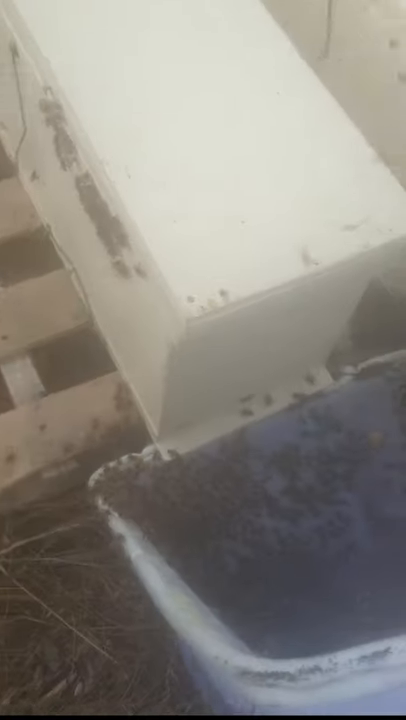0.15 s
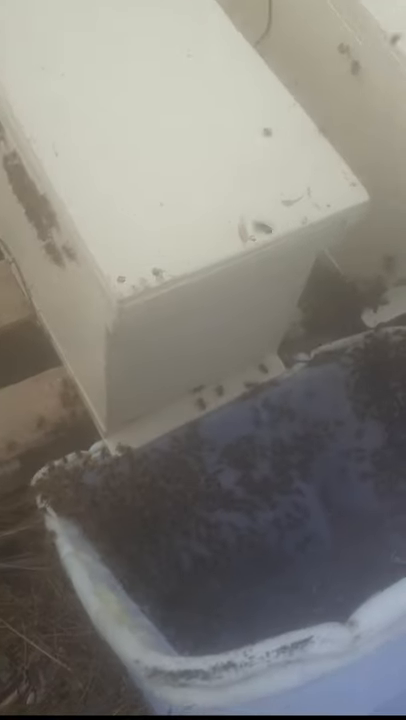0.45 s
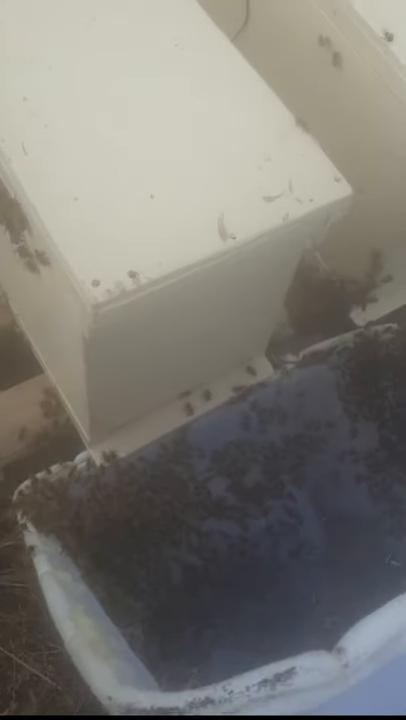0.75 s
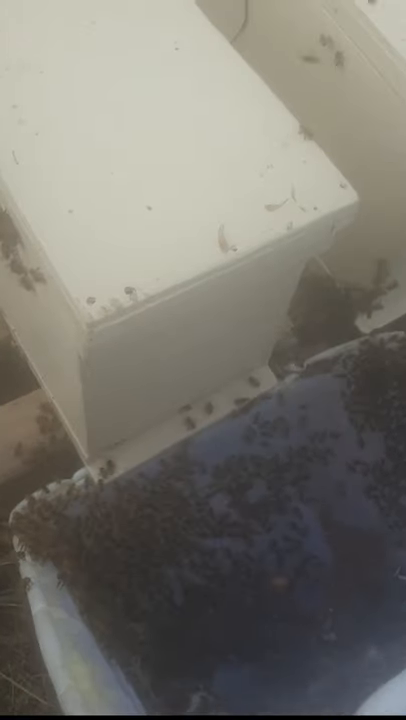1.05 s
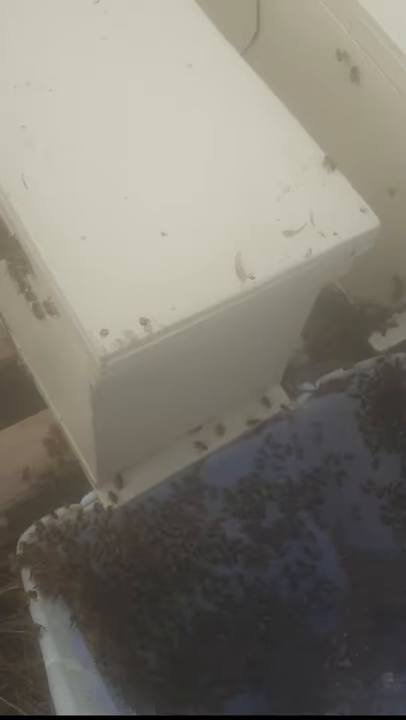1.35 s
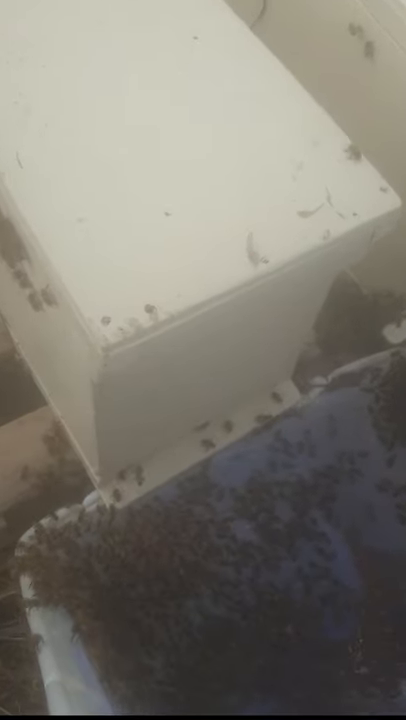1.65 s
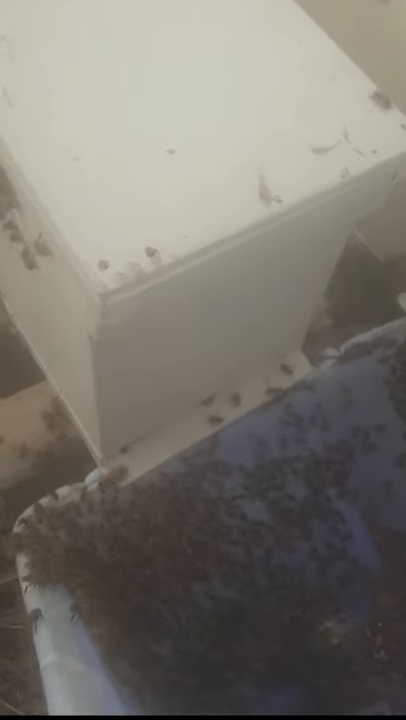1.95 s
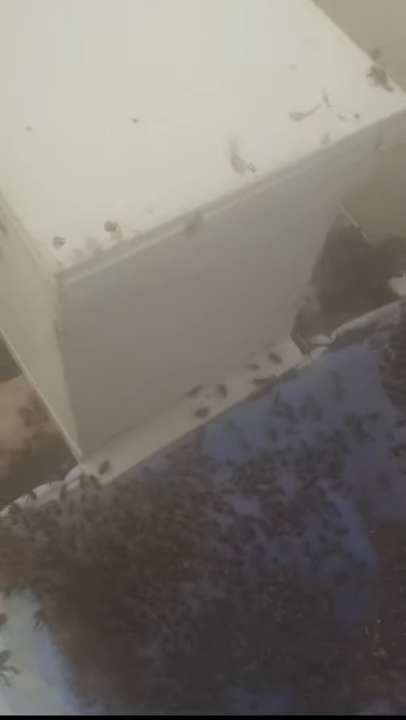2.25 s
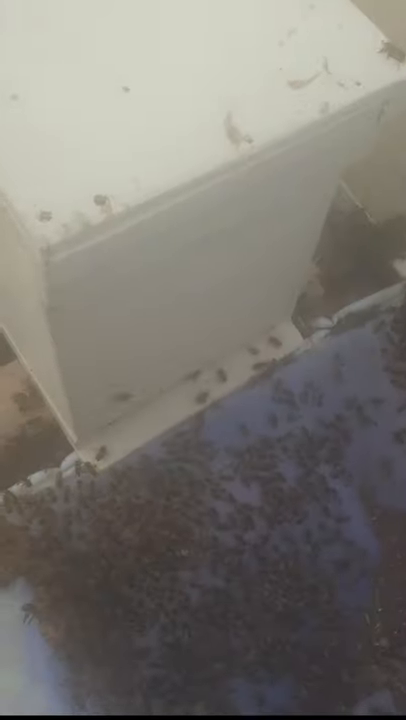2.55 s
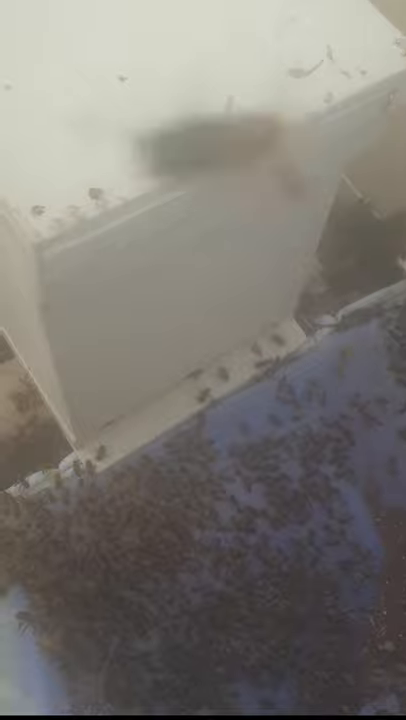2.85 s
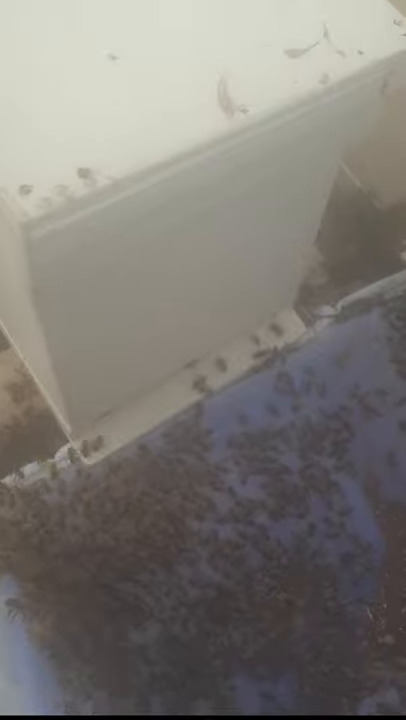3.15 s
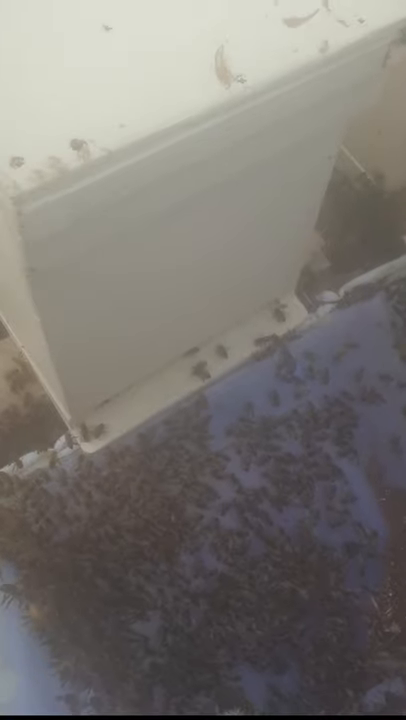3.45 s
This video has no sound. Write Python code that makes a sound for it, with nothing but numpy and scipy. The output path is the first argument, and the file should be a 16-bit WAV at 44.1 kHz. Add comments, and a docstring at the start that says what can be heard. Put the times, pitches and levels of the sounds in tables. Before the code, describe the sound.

Massed bees buzz in a thick continuous hum, with single bees whining past close by.

```python
"""A broad hum fills the right side: a mass of honey bees outdoors at the mouth of a wooden hive box.
Trains of air pulses at many wing rates merge into the hum; two bees fan on the spot with a steady note.
Nearer bees whine, rasp and fizz in swells, single bees fly past, and wings rattle briefly on the box.
Late on, one bee hovers by the microphone and a soft low double bump sounds: sagging tones with noise.
Filtered noise makes the air, its rumble and the left side's hiss, which covers a trace of the bees."""
import sys
import numpy as np
from scipy import signal
from scipy.fft import rfft, irfft
from scipy.io import wavfile

SR = 44100
rng = np.random.default_rng(int(sys.argv[2]) if len(sys.argv) > 2 else 0)


def transcribe(u):
    """Save the signal u as a 16-bit wav file named by the first command-line argument.

    u: samples, shape (n,) or (channels, n), limited to [-1, 1]; the rate is SR.
    q: integer samples, one column per channel.
    """
    v = np.clip(np.atleast_2d(u).T, -1, 1)
    q = np.round(v * 32767).astype(np.int16)
    wavfile.write(sys.argv[1], SR, q)


N = 158760
T = np.arange(N) / SR  # time [s]

# Every ..._COLOUR is a spectrum shape: (frequency [Hz], relative level [dB])

# Outdoor air on the right, hiss on the left: (frequency [Hz], relative level [dB per Hz])
AIR_COLOUR = [(15, -30), (55, -21.5), (130, -6.5), (300, -3.5), (800, -22), (3000, -35.5), (6700, -40),
              (8600, -60), (12000, -35), (15500, -47)]
LEFT_HISS_COLOUR = [(15, -22), (55, 1.5), (120, -5.5), (330, -13), (800, -18.5), (2150, -20.5), (2550, 0.5),
                    (2750, -5), (3100, -24), (5000, -28), (7500, -35.5), (11000, -25), (15500, -23.5)]
# Low rumble of the air, before RUMBLE_GAIN_DB: (time [s], level [dB])
RUMBLE_DB = [(0.0, -65), (0.03, -66), (0.37, -70.5), (0.38, -66.5), (0.98, -74), (1.25, -62), (1.41, -70.5),
             (1.69, -64), (1.71, -69.5), (2.32, -72.5), (2.34, -79), (2.82, -68.5), (3.16, -78), (3.2, -68)]
RUMBLE_COLOUR = [(15, -30), (35, 1), (55, 12), (100, 2.5), (170, 4), (400, -39.5)]

# Soft bumps: (start [s], ring level [dB], rise [s], decay [s], pitch at the end of the rise [Hz])
BUMPS = [(3.269, -37, 0.0436, .038, 82.9), (3.354, -42, 0.036, 0.03, 72)]
BUMP_COLOUR = [(20, -15), (50, 1), (100, -1), (125, -7), (175, -1.5), (260, -18.5), (600, -24), (2000, -70)]

# Brief wing rattles against the box: (centre [s], spread [s], level [dB])
RATTLES = [(0.101, .012, -56), (0.581, 0.01, -53.5), (1.062, 0.0083, -54.5), (1.395, 0.011, -55),
           (1.46, 0.0072, -50.5), (1.87, 0.015, -63)]
RATTLE_COLOUR = [(200, -5), (1500, -23), (2800, -38.5), (3900, 8), (5000, -2.5), (6500, -18), (7500, -29),
                 (9000, -41), (12000, -35), (14000, -54)]

# Bees flying by: (closest [s], half length [s], level [dB], wing beats [Hz], glide [share per s])
FLYBYS = [(0.078, 0.21, -51, 252.3, 0.02), (0.261, 0.067, -49.5, 248.5, -.05),
          (0.806, .14, -54.5, 273.2, -.05), (1.192, 0.055, -52, 241.6, .05),
          (1.705, 0.053, -54, 229.7, -0.13), (2.074, .08, -59, 244, -.05), (2.401, 0.18, -51.5, 241.2, .05)]
FLYBY_COLOUR = [(120, -57), (250, -2.5), (500, 0.5), (760, -18.5), (1000, -10), (1300, -12), (1550, 1),
                (2050, -25), (2700, -45.5), (4350, -22.5), (5400, -25), (6600, -68), (12000, -62),
                (14000, -70)]

# The bee hovering by the microphone: (time [s], wing beats [Hz], level [dB])
HOVER_PATH = [(2.55, 236, -79), (2.678, 237.1, -49.5), (2.779, 243.7, -53), (2.811, 239.3, -46.5),
              (2.979, 238.8, -47.5), (3.08, 244.2, -47), (3.129, 255, -46), (3.19, 253.6, -47.5),
              (3.26, 256.6, -42.5), (3.33, 251.2, -54), (3.45, 248, -72)]
HOVER_COLOUR = [(120, -30), (250, -8.5), (500, -3), (760, -25), (1000, -19), (1300, -15), (1520, 3),
                (1700, 3.5), (1950, -14), (2200, -15.5), (2700, -21.5), (3100, -19), (3600, -29.5),
                (4400, -13.5), (4900, -29.5), (5500, -27), (6600, -58), (14000, -70)]

# Nearer bees' nasal whine, treble rasp and thin fizz, before their gains: (time [s], level [dB])
WHINE_DB = [(0.0, -65), (0.04, -73), (0.27, -54), (0.54, -60.5), (0.87, -72), (1.38, -56), (1.6, -59),
            (1.72, -67), (2.0, -54), (2.59, -67.5), (2.8, -50.5), (2.81, -48.5), (3.5, -64.5), (3.6, -52.5)]
RASP_DB = [(0.0, -66), (0.06, -69), (0.1, -64), (0.13, -63.5), (0.3, -55), (0.59, -60), (0.61, -64.5),
           (0.95, -79), (1.03, -68), (1.06, -62.5), (1.09, -67), (1.35, -62.5), (1.37, -55.5), (1.7, -70.5),
           (1.86, -67), (1.87, -58), (1.92, -63), (2.04, -60), (2.5, -70), (2.52, -65), (2.58, -73.5),
           (2.85, -56), (3.18, -65.5), (3.22, -63.5), (3.46, -73.5), (3.6, -60)]
FIZZ_DB = [(0.0, -87), (0.04, -92), (0.32, -73.5), (0.57, -79), (0.63, -82), (1.01, -96), (1.32, -82.5),
           (1.48, -82.5), (1.69, -95.5), (1.98, -81), (2.53, -92), (2.93, -90), (2.95, -88.5),
           (3.57, -87.5), (3.6, -88)]
WHINE_COLOUR = [(150, -20), (440, -1.5), (850, -34), (1250, -12.5), (1650, 2.5), (2050, -0.5), (2350, -8),
                (2700, -24.5), (3200, -48)]
RASP_COLOUR = [(1500, -31), (2300, -8.5), (2750, -16), (3100, -12), (3400, -12.5), (3900, -6.5), (4400, -7),
               (5400, -19), (6100, -31.5), (6750, -73), (7500, -34), (8400, -48), (10000, -65)]
FIZZ_COLOUR = [(4300, -3), (5100, 15), (5600, 13), (6100, 2), (6700, -21), (7500, 1), (8600, -13),
               (9700, 0.5), (11000, 4.5), (12600, -0.5), (13100, 0), (13700, -25)]

# Bees fanning on the spot: (wing beats [Hz], level [dB])
FANNERS = [(218, -57.5), (220.5, -55)]
FAN_COLOUR = [(100, -21), (220, -11.5), (440, 3), (660, -19), (880, -25.5), (1400, -26.5), (2500, -35),
              (6000, -81), (14000, -80)]

# Spread of wing rates among the bees: (share of bees that beat slower [0-1], wing beats [Hz])
WING_RATES = [(0, 183.4), (.17, 197.4), (.36, 215), (.6, 226.8), (.8, 242.3), (.96, 259.8), (1, 272.4)]
# The cluster's deep hum and nasal buzz: (time [s], level [dB])
HUM_DB = [(0, -49.5), (.5, -50.5), (1, -49), (1.35, -47.5), (1.7, -45), (2.1, -46), (2.45, -45.5),
          (2.8, -46.5), (3.05, -44), (3.35, -44.5), (3.6, -51.5)]
BUZZ_DB = [(0, -48), (.5, -48.5), (1, -49.5), (1.4, -47), (1.75, -48), (2.2, -47), (2.45, -46.5), (3, -46),
           (3.3, -46), (3.6, -46.5)]
HUM_COLOUR = [(100, -39), (180, -3.5), (255, -6.5), (320, 1), (380, 1), (450, 0), (520, -1), (600, -14),
              (700, -13.5), (820, -30), (1100, -27), (2000, -81)]
BUZZ_COLOUR = [(400, -38), (820, -23), (1000, -15.5), (1220, -5), (1520, -2.5), (2000, -17.5),
               (2750, -39.5), (4200, -29), (5600, -40), (6700, -74), (7500, -45.5), (8600, -75),
               (10000, -66), (12300, -41), (13000, -40), (13600, -62)]

# Wing beats: rate wander (rms share) and strength flutter (rms dB), each with its top speed
WANDER, WANDER_HZ, FLUTTER_DB, FLUTTER_HZ = .018, 6, 2, 9
# Random timing error of each beat, in seconds: smooth and rough
JITTER_S, ROUGH_JITTER_S = .00002, .00007
BEAT_COUNT = 1200  # enough beats per bee to outlast the scene
WHINE_GAIN_DB, RASP_GAIN_DB, FIZZ_GAIN_DB, RUMBLE_GAIN_DB = 7, 6, 13.5, 6.5
BUMP_SAG_PER_S, BUMP_NOISE_DB = 2.2, -2  # noise is relative to the ring
AIR_DB, LEFT_HISS_DB = -58, -70
BEE_LEAK_DB, BUMP_LEAK_DB = -44.5, -31  # trace on the left, relative to the right
EDGE_HZ = 15720  # top of the recorder's band


def amp(db):
    """Turns decibels into gain."""
    return 10 ** (np.asarray(db) / 20)


def evened(x):
    """Scales a signal to unit rms."""
    return x / np.sqrt(np.mean(x ** 2) + 1e-20)


def level(points):
    """Draws a gain envelope through (time [s], level [dB])."""
    return amp(np.interp(T, *np.transpose(points)))


def coloured(x, colour):
    """Shapes a signal by a spectrum, drops all up to 12 Hz and scales it to unit rms."""
    f, db = np.transpose(colour)
    hz = np.fft.rfftfreq(N, 1 / SR)
    gain = amp(np.interp(np.log(hz + 1), np.log(f), db)) * (hz > 12)
    return evened(irfft(rfft(x) * gain, N))


def noise(colour):
    """Makes steady random noise of a given colour, at unit rms."""
    return coloured(rng.standard_normal(N), colour)


def drift(t, top_hz):
    """Sums slow sines up to about top_hz, weaker as they get faster, into unit-rms random motion."""
    f = np.geomspace(.3, top_hz, 14)[:, None]
    cycles = f * t * rng.uniform(.8, 1.2, f.shape) + rng.random(f.shape)
    return evened((np.sin(2 * np.pi * cycles) / f ** .3).sum(0))


def pulses(place, size):
    """Sets clicks at places in samples, each shared between the two samples around it."""
    inside = (place > 0) & (place < N - 1)
    place, size = place[inside], size[inside]
    i, part = place.astype(int), place % 1
    return np.bincount(i, size * (1 - part), N) + np.bincount(i + 1, size * part, N)


def wings(hz, wander, flutter_db, jitter_s, glide=0, at=0):
    """One bee: a pulse of air for each wing beat, wavering in rate and strength."""
    t = np.arange(BEAT_COUNT) / hz
    rate = hz * np.exp(wander * drift(t, WANDER_HZ) + glide * np.clip(t - at, -.5, .5))
    head_start = rng.random() * 2 / hz  # up to two beats, so bees do not start in step
    beats = np.cumsum(1 / rate) - head_start + jitter_s * rng.standard_normal(BEAT_COUNT)
    return pulses(beats * SR, amp(flutter_db * drift(t, FLUTTER_HZ)))


def swarm(jitter_s, count):
    """Layers many bees, spread over the range of wing rates."""
    shares = (np.arange(count) + .5) / count
    rates = np.interp(shares, *np.transpose(WING_RATES))
    return sum(wings(hz, WANDER, FLUTTER_DB, jitter_s) for hz in rates)


def left_hiss():
    """Steady coloured noise: the hiss of the nearly deaf left channel."""
    return amp(LEFT_HISS_DB) * noise(LEFT_HISS_COLOUR)


def outdoor_air():
    """Steady broadband noise over a low noise rumble that rises and falls."""
    rumble = amp(RUMBLE_GAIN_DB) * level(RUMBLE_DB) * noise(RUMBLE_COLOUR)
    return amp(AIR_DB) * noise(AIR_COLOUR) + rumble


def bump(start, db, rise_s, decay_s, hz):
    """A dull thud: a low ring that sags in pitch, with a puff of noise."""
    after_rise = T - start - rise_s
    shape = np.clip((T - start) / rise_s, 0, 1) * np.exp(-np.maximum(after_rise, 0) / decay_s)
    pitch = hz * np.exp(-BUMP_SAG_PER_S * np.clip(after_rise, -.1, .2))
    ring = evened(np.sin(2 * np.pi * (np.cumsum(pitch) / SR + rng.random())))
    return amp(db) * shape * (ring + amp(BUMP_NOISE_DB) * noise(BUMP_COLOUR))


def rattle(centre, spread_s, db):
    """Wings brush the box: a short bell-shaped burst of very unevenly timed beats."""
    shape = np.exp(-.5 * ((T - centre) / spread_s) ** 2)
    return amp(db) * shape * coloured(swarm(jitter_s=0.00041, count=9), RATTLE_COLOUR)


def flyby(closest, half_s, db, hz, glide):
    """One bee comes close and leaves: its level peaks as its wing rate glides."""
    beats = wings(hz, wander=.008, flutter_db=0, jitter_s=JITTER_S, glide=glide, at=closest)
    nearness = 1 / (1 + ((T - closest) / half_s) ** 2)
    return amp(db) * nearness * coloured(beats, FLYBY_COLOUR)


def hovering_bee(wander, jitter_s):
    """One bee hangs close by: even pulses follow its changing wing rate, then it leaves."""
    s, hz, db = np.transpose(HOVER_PATH)
    waver = np.interp(T, T[::100], drift(T[::100], top_hz=25.2))
    turns = np.cumsum(np.interp(T, s, hz) * (1 + wander * waver)) / SR
    # a beat falls at each whole turn; -1 puts the surplus beats outside the scene
    beats = np.interp(np.arange(BEAT_COUNT), turns, T, right=-1)
    beats = beats + jitter_s * rng.standard_normal(BEAT_COUNT)
    buzz = coloured(pulses(beats * SR, np.ones(BEAT_COUNT)), HOVER_COLOUR)
    return amp(np.interp(T, s, db)) * buzz


def near_bees():
    """Small groups of close bees add whine, rasp and fizz that swell and fade."""
    whine = amp(WHINE_GAIN_DB) * level(WHINE_DB) * coloured(swarm(JITTER_S, count=10), WHINE_COLOUR)
    rasp = amp(RASP_GAIN_DB) * level(RASP_DB) * coloured(swarm(ROUGH_JITTER_S, count=14), RASP_COLOUR)
    fizz = amp(FIZZ_GAIN_DB) * level(FIZZ_DB) * coloured(swarm(ROUGH_JITTER_S, count=14), FIZZ_COLOUR)
    return whine + rasp + fizz


def fanning_bee(hz, db):
    """A bee fanning on the spot: its wing rate wanders little, so its note stays steady."""
    beats = wings(hz, wander=0.00701, flutter_db=2.0, jitter_s=JITTER_S)
    return amp(db) * coloured(beats, FAN_COLOUR)


def crowd():
    """The cluster: the same mass of wing beats heard as a deep hum and a nasal buzz."""
    beats = swarm(JITTER_S, count=30)
    hum = level(HUM_DB) * coloured(beats, HUM_COLOUR)
    buzz = level(BUZZ_DB) * coloured(beats, BUZZ_COLOUR)
    return hum + buzz


def scene():
    """Bees, bumps and air reach the right side; the left gets a trace of bees and bumps under hiss."""
    thuds = sum(bump(*row) for row in BUMPS)
    bees = sum(rattle(*row) for row in RATTLES) + sum(flyby(*row) for row in FLYBYS)
    bees = bees + hovering_bee(wander=.009, jitter_s=.00004) + near_bees()
    bees = bees + sum(fanning_bee(*row) for row in FANNERS) + crowd()
    left = amp(BEE_LEAK_DB) * bees + amp(BUMP_LEAK_DB) * thuds + left_hiss()
    right = bees + thuds + outdoor_air()
    return np.array([left, right])


def record(dry):
    """The recorder's band limit: a steep low-pass filter."""
    low_pass = signal.firwin(801, EDGE_HZ, window=("kaiser", 9), fs=SR)
    return signal.oaconvolve(dry, low_pass[None], "same")


dry = scene()
out = record(dry)
transcribe(out)
```